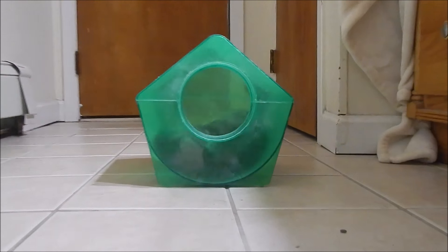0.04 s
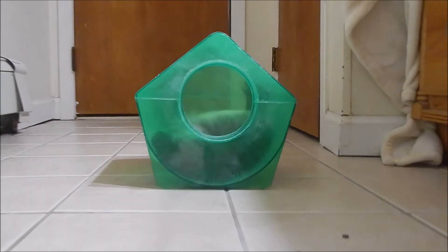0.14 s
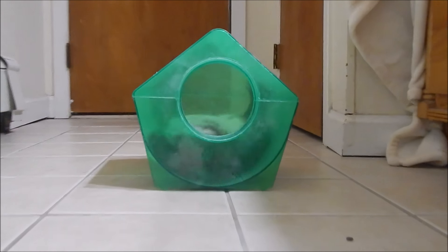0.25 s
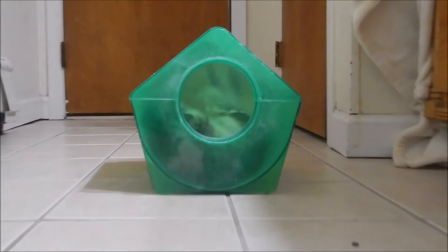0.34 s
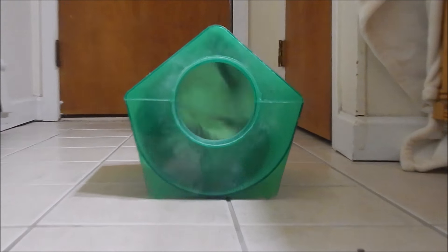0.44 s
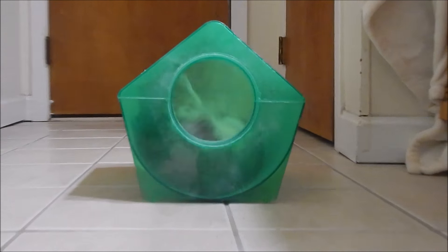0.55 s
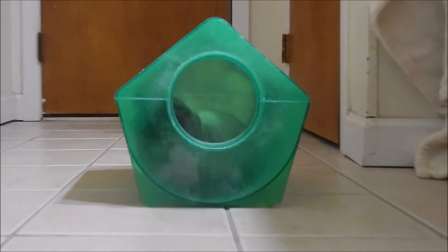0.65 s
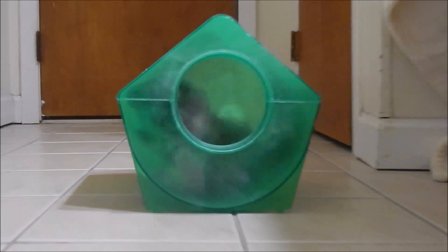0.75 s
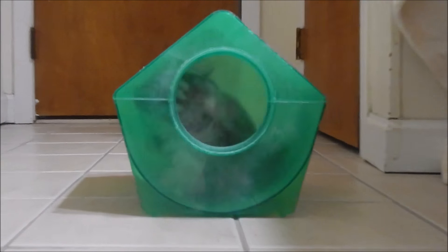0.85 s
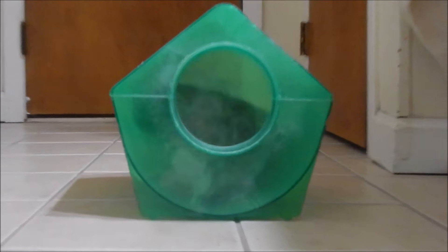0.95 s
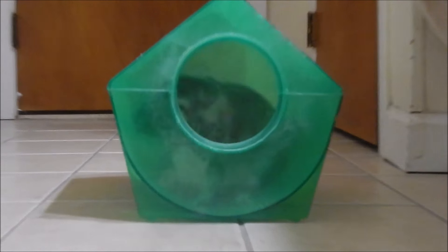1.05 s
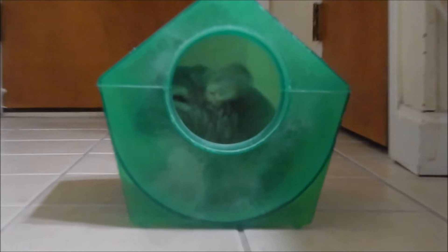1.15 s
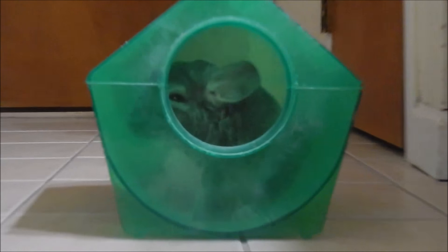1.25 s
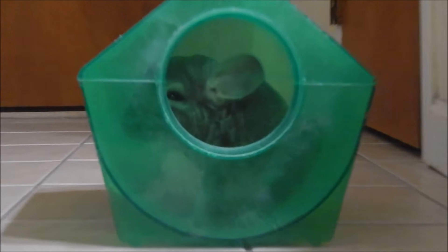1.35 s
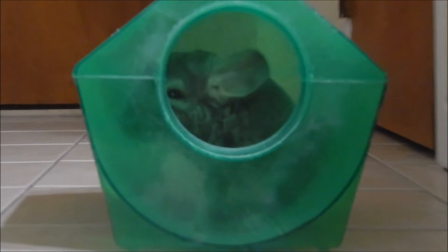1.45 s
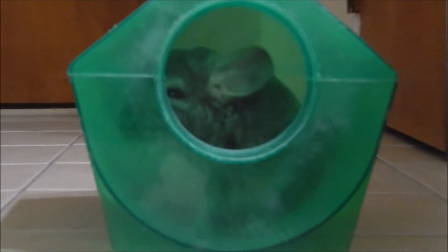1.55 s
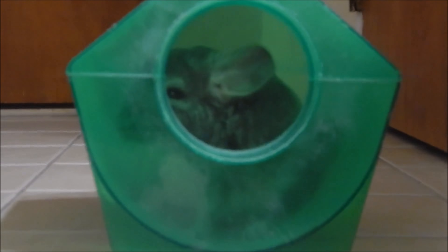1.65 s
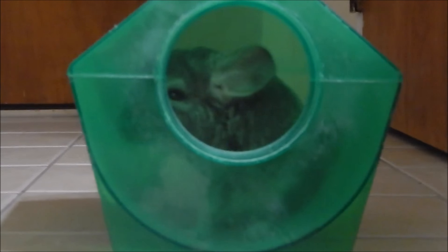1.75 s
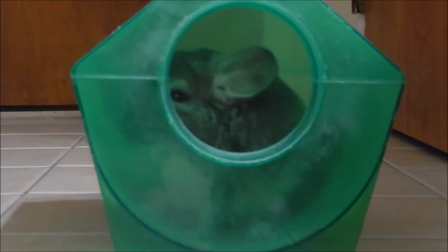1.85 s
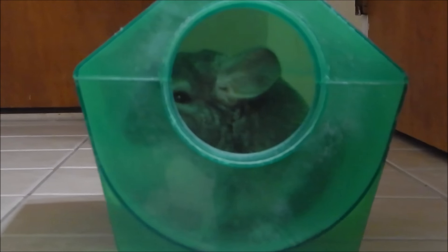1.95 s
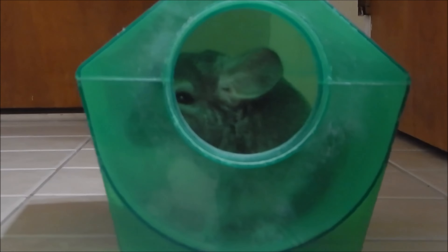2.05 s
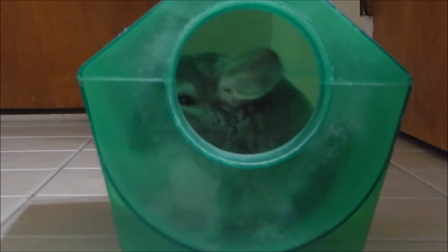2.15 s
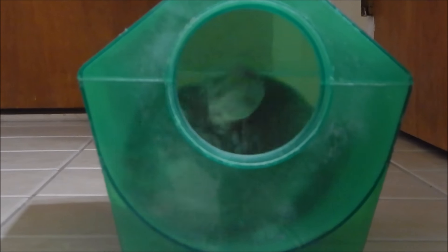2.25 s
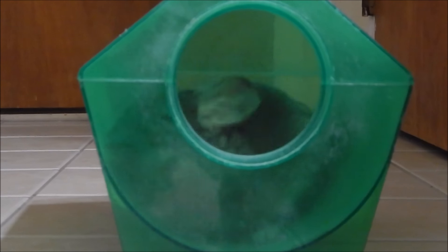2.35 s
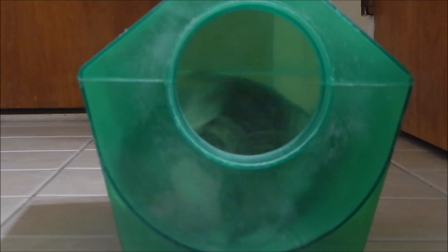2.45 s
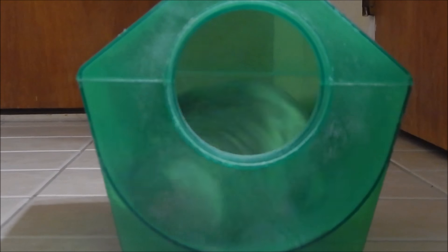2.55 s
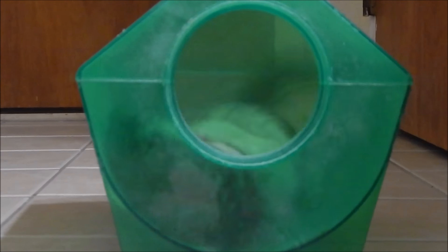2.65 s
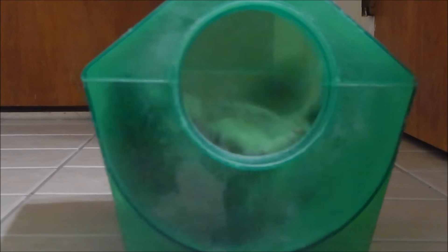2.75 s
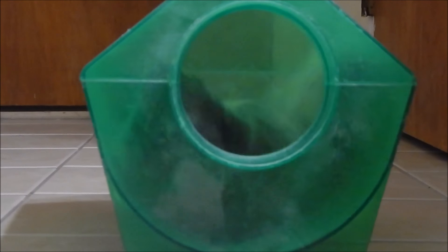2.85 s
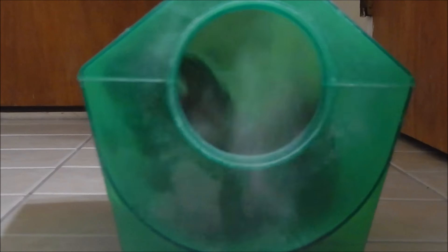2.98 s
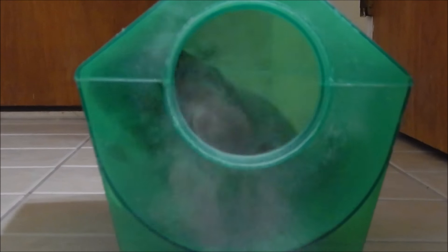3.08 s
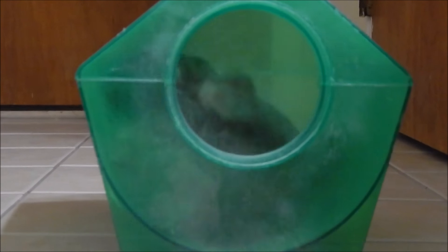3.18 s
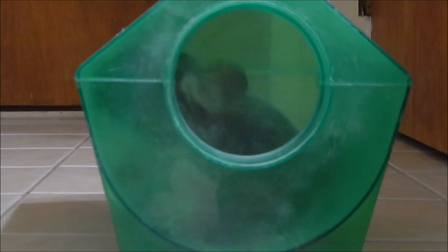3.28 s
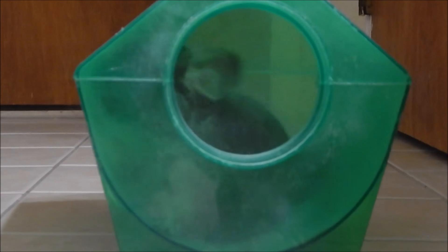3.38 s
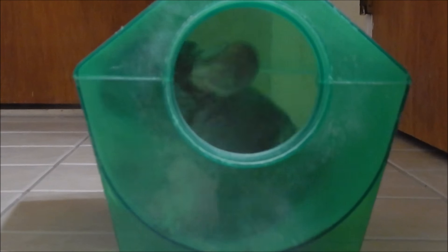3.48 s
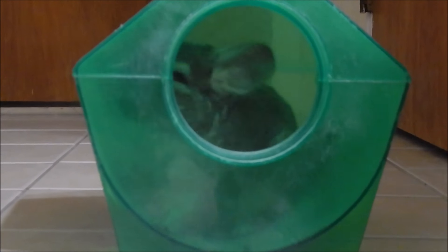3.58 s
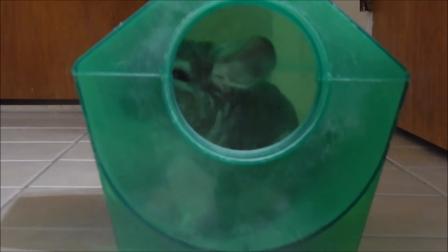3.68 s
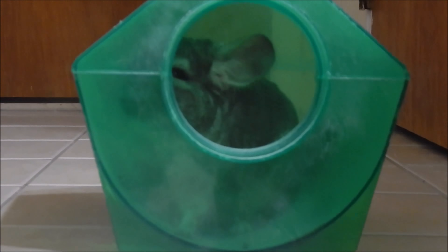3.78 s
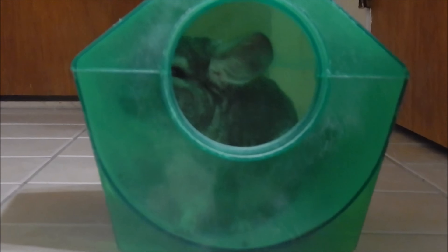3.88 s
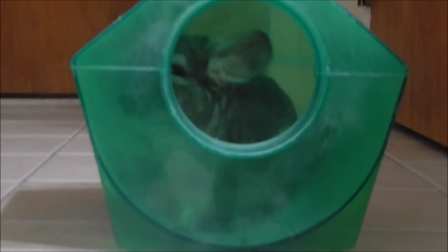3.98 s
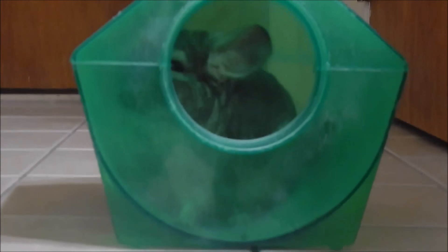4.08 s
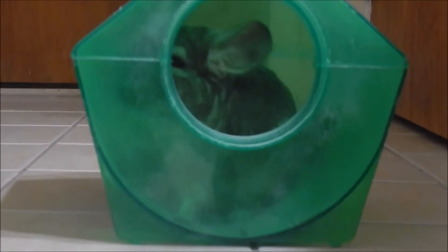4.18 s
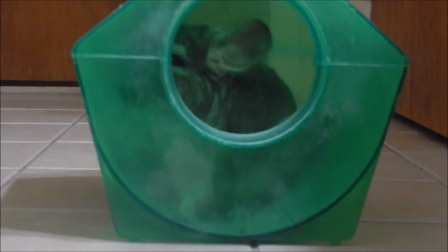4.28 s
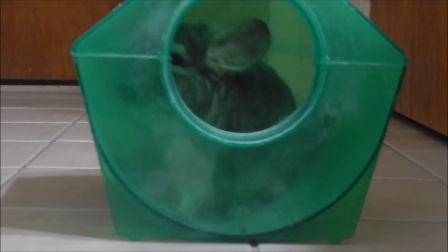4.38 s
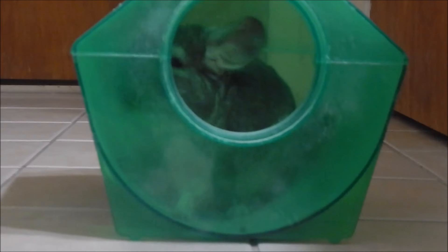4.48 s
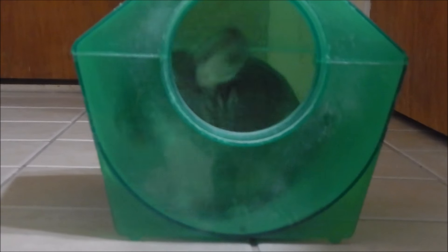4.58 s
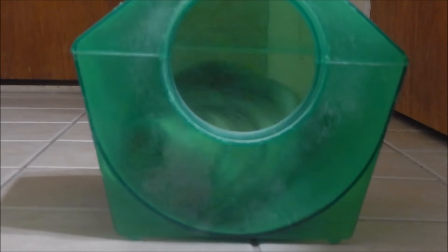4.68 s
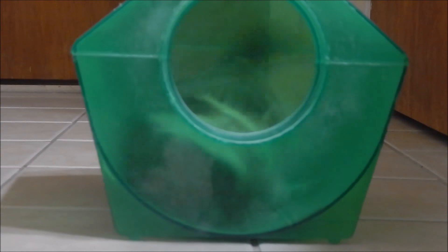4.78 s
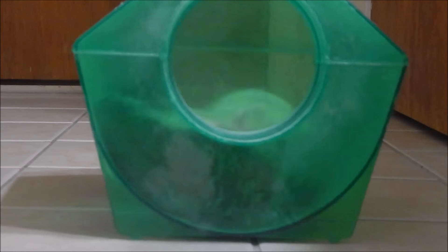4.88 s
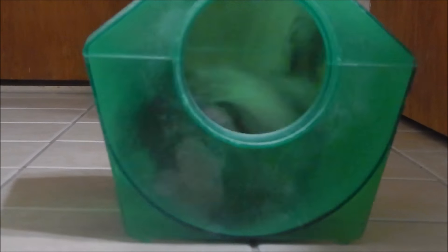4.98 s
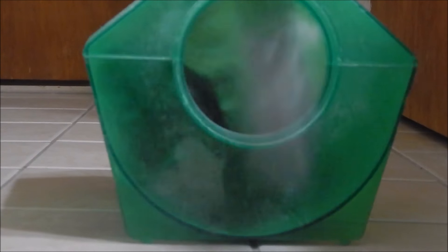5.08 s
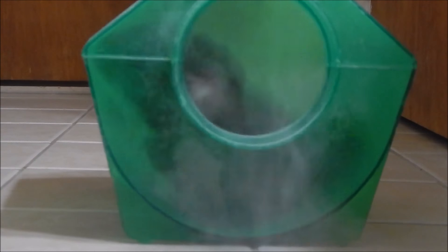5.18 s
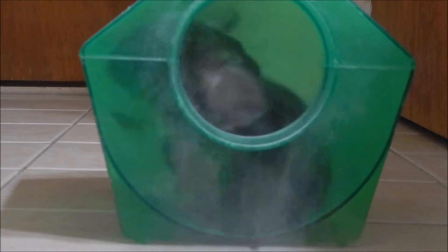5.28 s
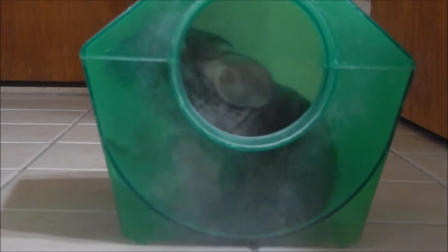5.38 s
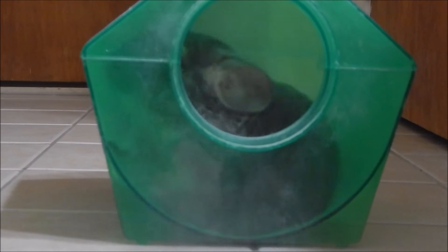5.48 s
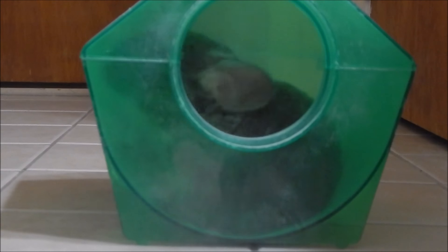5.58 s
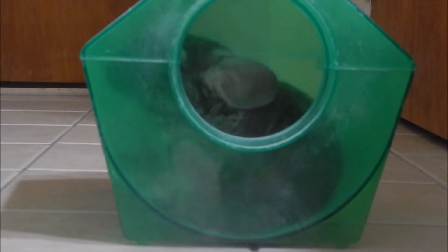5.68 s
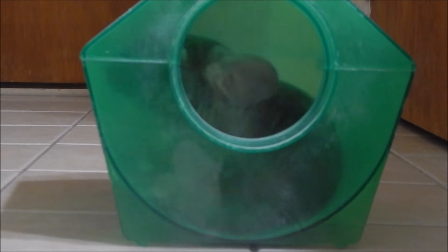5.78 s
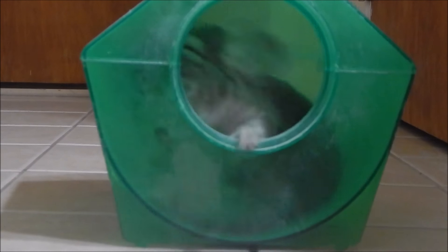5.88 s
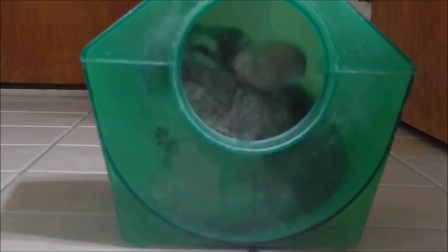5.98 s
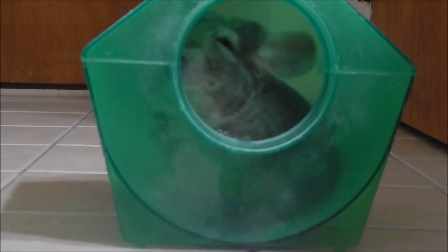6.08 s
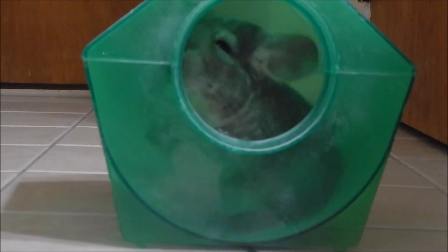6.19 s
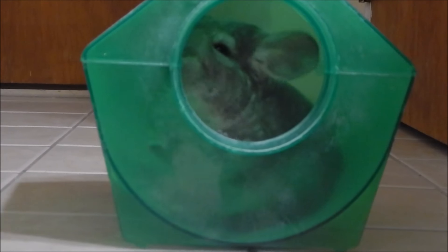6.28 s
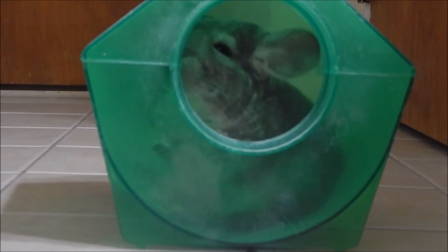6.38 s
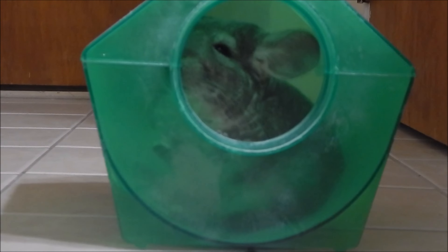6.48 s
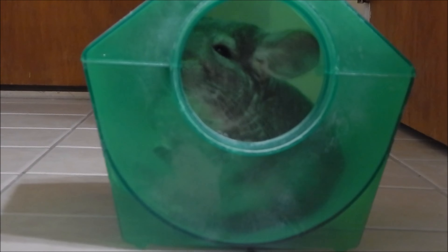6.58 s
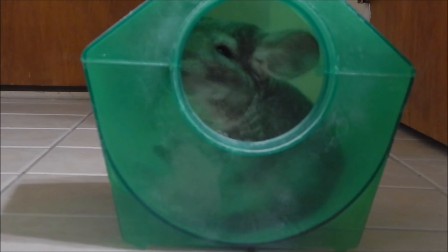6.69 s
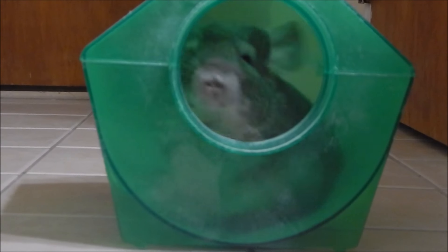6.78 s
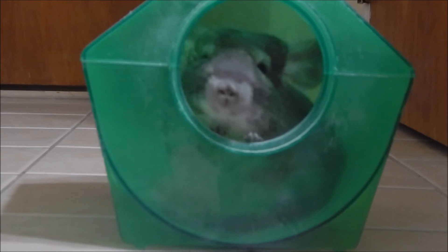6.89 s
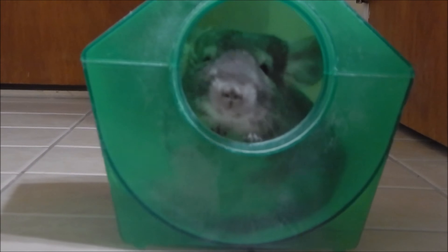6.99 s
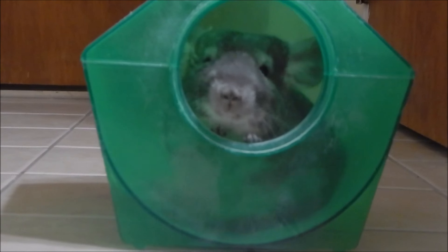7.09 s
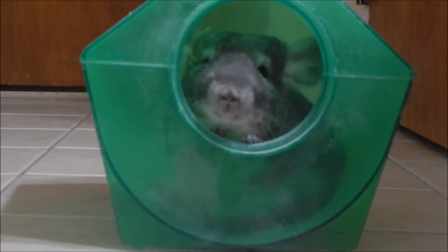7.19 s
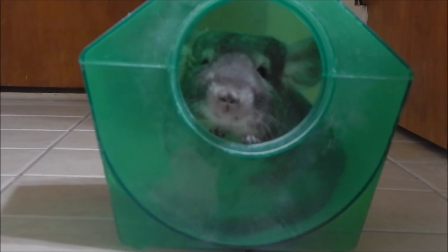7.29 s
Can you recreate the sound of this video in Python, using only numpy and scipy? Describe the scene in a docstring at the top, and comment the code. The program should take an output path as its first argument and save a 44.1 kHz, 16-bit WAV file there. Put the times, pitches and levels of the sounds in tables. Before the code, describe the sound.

A low steady hum and faint fan noise lie under bursts of hollow plastic drumming, as feet and body hit a thin shell. Soft dust hiss and short midrange scratches accompany each burst. A thin lens motor whine ends in a very loud dry snap, briefly dipping everything else. Two later bursts fade to small bumps. Close camera microphone indoors, short room echo, needle-like ticks.

```python
"""Dust bath in a plastic house

A small furry animal rolls in fine dust inside a hollow plastic house on a tiled floor, in bursts.
Blows and feet excite decaying modes of the shell; shaped noise makes dust hiss and claw strokes rasp.
An appliance adds hum tones, fan noise and rumble; random echoes make the room. A camera's lens motor
whines until the camera's lever snaps loudly, after one fainter snap; sharp ticks sound in the middle.
The gain control ducks when treble peaks are strong, then slowly recovers."""
import sys
import numpy as np
from scipy import signal
from scipy.io import wavfile
from scipy.ndimage import uniform_filter1d

SR = 44100
rng = np.random.default_rng(int(sys.argv[2]) if len(sys.argv) > 2 else 0)


def master(y):
    """Save y as 16-bit WAV."""
    cut = np.clip(np.atleast_2d(y).T, -1, 1)
    pcm = np.round(cut * 32767)  # scale
    wavfile.write(sys.argv[1], SR, pcm.astype(np.int16))


def gain_from_db(level_db):
    """Convert decibel levels to linear amplitude factors (20 dB per decade)."""
    decades = np.asarray(level_db, float) / 20
    return 10 ** decades


N = 323550


def evened(x):
    """Power normalisation: scales to rms 1."""
    return x / np.sqrt(np.mean(x ** 2) + 1e-20)


def read(points, hz):
    """Logarithmic frequency scale: interpolates a spectrum table along it."""
    f, value = np.transpose(points)
    return np.interp(np.log(hz + 1), np.log(f + 1), value)


def ring(hz, db, t60, rise):
    """Damped resonance: a sine mode that builds up over rise cycles and loses 60 dB in t60 seconds."""
    t = np.arange(SR // 3) / SR
    decay = gain_from_db(db - 60 * t / t60)
    buildup = 1 - np.exp(-t * hz / rise)
    return decay * buildup * np.sin(2 * np.pi * hz * t)


def noise(colour, same, patchy_db, size=1024):
    """Interchannel coherence: two partly alike channels of coloured noise with drifting patches."""
    frames, hz = 4 * N // size + 5, np.fft.rfftfreq(size, 1 / SR)
    a, b, c, d, patches = rng.standard_normal((frames, len(hz), 5)).T
    # smooth the patches along frequency, then time
    patches = uniform_filter1d(patches, 10, 0)
    patches = evened(uniform_filter1d(patches, 10, 1))
    same = np.clip(read(same, hz), -1, 1)[:, None]
    left, other = a + 1j * b, c + 1j * d
    right = same * left + np.sqrt(1 - same ** 2) * other
    spectra = np.array([left, right]) * gain_from_db(read(colour, hz)[:, None] + patchy_db * patches)
    sound = signal.istft(spectra, nperseg=size, noverlap=3 * size // 4)[1]
    return evened(sound[:, :N])


# how busy the animal is: start_s [s], scrabble_db [dB], dust_db (trickling) [dB]
ACTIVITY = [(0, -28.5, -56.5), (0.3, -31.5, -57.5), (0.68, -21, -54), (0.948, -40, -45.5), (1.1, -25, -58),
            (1.32, -34, -57.5), (1.551, -65, -58), (1.85, -60, -72), (2.25, -53.5, -65),
            (2.502, -28.5, -45.5), (3.099, -22.5, -56.5), (3.36, -49.5, -66), (3.7, -56, -64),
            (4.1, -52, -76), (4.55, -48.5, -63), (4.75, -32.5, -49.5), (4.95, -16, -60), (5.1, -27.5, -54),
            (5.3, -30, -48.5), (5.501, -44, -59), (5.799, -53, -61), (6.099, -36.5, -53.5),
            (6.5, -34, -67.5), (6.661, -57, -76), (6.9, -36, -56), (7.1, -49, -74), (7.33, -49, -79)]


def curve(column):
    """Amplitude envelope: one level column of the animal's activity at every sample, as gain."""
    rows = np.transpose(ACTIVITY)
    return gain_from_db(np.interp(np.arange(N) / SR, rows[0], rows[column]))


# the body sweeps dust along the wall: middle_s [s], length_s [s], dust_db [dB], claws_db [dB]
SWEEPS = [(0.207, .1, -56, -48), (0.411, 0.096, -48, -48.5), (0.532, 0.11, -47, -48.5),
          (0.681, 0.071, -45, -46.5), (0.804, 0.082, -50, -45.5), (0.895, .07, -54, -44),
          (1.035, .16, -47, -37), (2.312, 0.11, -57, -47), (2.45, 0.02, -42, -38.5),
          (2.516, 0.096, -43, -36.5), (2.791, 0.14, -41, -48), (2.988, 0.029, -48, -33),
          (3.107, 0.15, -47, -47), (3.46, 0.2, -54.5, -48.5), (3.585, 0.044, -46.5, -55),
          (3.67, 0.095, -53.5, -49.5), (4.655, 0.068, -55, -50), (4.776, 0.18, -43, -39),
          (4.928, 0.14, -43, -43), (5.029, 0.094, -41, -42.5), (5.15, 0.057, -49, -46.5),
          (5.297, 0.21, -53.5, -44), (5.588, 0.064, -56, -54), (5.667, 0.052, -51.5, -46),
          (5.944, .05, -51.5, -41), (6.022, 0.036, -51, -48), (6.114, 0.056, -45.5, -45),
          (6.175, 0.082, -46, -38), (6.257, 0.074, -51.5, -38.5), (6.856, 0.032, -49.5, -47),
          (6.911, 0.08, -51, -44)]


def swept(column, rest):
    """Power addition: sweeps, each a quick swell and slower fade, add to a resting gain."""
    t = np.arange(-SR // 2, SR // 2) / SR
    power = rest ** 2 * np.ones(N)
    for row in SWEEPS:
        # the swell takes 0.65 of the time of the fade; 6 dB is lost where away is 1
        away = 2 * abs(t) / row[1] / np.where(t < 0, 0.65, 1)
        at = np.arange(len(t)) + round(row[0] * SR) - SR // 2
        inside = (at >= 0) & (at < N)
        gain = gain_from_db(row[column] - 6 * away ** 1.78)
        power[at[inside]] += gain[inside] ** 2
    return np.sqrt(power)


# fan noise spectrum: frequency_hz [Hz], level_db (relative, per Hz) [dB]
AIR = [(88, -46), (150, -5), (217, -3.5), (244, -4), (275, -5.5), (383, -13.5), (414, -14), (649, -17.5),
       (702, -8.5), (759, -15.5), (888, -4.5), (1210, -18), (2310, -27), (2500, -29), (16000, -61.5)]
# left-right likeness of fan noise, rumble and claw strokes: frequency_hz [Hz], likeness [-1 to 1]
AIR_SAME = [(60, 0.95), (180, 0.92), (550, 0.95), (1650, 0.77), (4970, 0.092), (15000, 0.44)]
# rumble spectrum: frequency_hz [Hz], level_db (relative, per Hz) [dB]
RUMBLE = [(12, -24.5), (30, -13.5), (48, -4), (65, -1), (105, 3), (140, 8.5), (170, -49.5)]
# appliance tones: pitch_hz [Hz], level_db [dB]
HUM = [(120.4, -26), (60.4, -61), (26, -53)]


def hum():
    """Superposition: a mains tone and faint lower tones waver slightly over fan noise and rumble."""
    t = np.arange(N) / SR
    waver = uniform_filter1d(rng.standard_normal(N), 6000)
    waver = evened(uniform_filter1d(waver, 6000))
    tones = np.zeros(N)
    for hz, db in HUM:
        tones += np.sqrt(2) * gain_from_db(db + 0.3 * waver) * np.sin(2 * np.pi * hz * t)
    air = gain_from_db(-41) * noise(AIR, AIR_SAME, patchy_db=1.5)
    rumble = gain_from_db(-41) * noise(RUMBLE, AIR_SAME, patchy_db=-3.0, size=4096)
    return tones + air + rumble


# dust hiss spectrum: frequency_hz [Hz], level_db (relative, per Hz) [dB]
DUST = [(710, -33), (1200, -16), (1630, -6), (1810, -16), (2480, -10), (3870, -13), (5130, -15),
        (10600, -16.5), (14700, -25.5), (16000, -71)]
# left-right likeness of the hiss: frequency_hz [Hz], likeness [-1 to 1]
DUST_SAME = [(1000, 0.27), (3000, 0.07), (15000, 0.12)]
# claws on the wall: start_s [s], level_db [dB], centre_hz [Hz]
CLAWS = [(2.2974, -34, 1730), (3.4356, -33.5, 2000), (3.5713, -31.5, 1770), (5.9484, -41, 3500),
         (6.1774, -35, 1800), (6.2467, -31.5, 1670), (6.8468, -42, 2130)]


def dust():
    """Granular noise: fine grains sweep the walls with slight flutter, and a few claws scratch."""
    flutter = evened(uniform_filter1d(rng.standard_normal(N), 500))
    hiss = noise(DUST, DUST_SAME, patchy_db=1.5, size=256)
    out = swept(column=2, rest=curve(column=2)) * gain_from_db(1.6 * flutter) * hiss
    t = np.arange(3000) / SR
    for s, db, hz in CLAWS:
        grit = rng.standard_normal((2, len(t)))
        grit = grit[0] + 0.32 * grit  # mostly shared by both sides
        band = signal.butter(1, [0.6 * hz, min(1.8 * hz, SR / 2.2)], "band", fs=SR)
        at = round(s * SR)
        out[:, at:at + len(t)] += gain_from_db(db - 60 * t / 0.026) * signal.lfilter(*band, grit)
    return out


# spectrum of claw strokes and faint fan noise: frequency_hz [Hz], level_db (relative, per Hz) [dB]
SCRATCH = [(900, 4), (1500, -3), (2100, -1.5), (2700, -16), (3500, -19), (5000, -34), (9000, -52.5)]


def scratch():
    """Amplitude modulation: claw strokes rasp in the midrange over a faint, steady, grainy fan noise."""
    grain_db = 3.5 * evened(uniform_filter1d(rng.standard_normal(N), 200))
    grainy = gain_from_db(grain_db) * noise(SCRATCH, AIR_SAME, patchy_db=-0.5, size=256)
    return swept(column=3, rest=gain_from_db(-59.5)) * grainy  # rest: the fan noise


# modes of the shell, grouped as floor drum, walls, thin panels: pitch_hz [Hz], level_db [dB], t60_s [s]
SHELL = [
    [(59.5, -8, 0.26), (80.6, -1.5, 0.26), (134.76, 2, 0.46), (148.44, 5, 0.6)],
    [(231.3, 5.5, 0.5), (266.3, 2, 0.34), (297.6, 2.5, 0.47), (336.8, -12, 0.25), (393.3, 2, 0.13)],
    [(525, 4, 0.27), (705, -14, 0.3), (744, 1.5, 0.16), (820, 6, 0.14), (1034, 7.5, 0.033),
     (1252, -6.5, 0.16), (1800, -14.5, 0.098), (1540, -2.5, 0.035), (2200, -25, .03)],
]
# scrabbling gain of the three groups: drum_db, walls_db, panels_db [dB]
SCRABBLE_MIX = [14, 13.85, -3.3]


def scrabble():
    """Impulse response: small random kicks of the feet set off every shell mode between the blows."""
    out, busy = np.zeros(N), curve(column=1)
    for group, mix_db in zip(SHELL, SCRABBLE_MIX):
        for hz, db, t60 in group:
            kicks = rng.random(N) < 75 / SR  # 75 per second on average
            feet = rng.standard_normal(N) * kicks * busy * gain_from_db(mix_db)
            mode = ring(hz, 0, t60, rise=0.39)
            mode *= gain_from_db(db) / np.linalg.norm(mode)
            out += signal.oaconvolve(feet, mode)[:N]
    return out


# lens motor while the lever is held: centre_hz [Hz], width_hz [Hz], level_db [dB]
WHINE = [(7250, 350, -68.5)]


def lens_motor():
    """Narrow-band noise: the lens motor whines until the lever is let go at the last snap."""
    out = np.zeros((2, N))
    held = np.arange(N) < SNAPS[-1][0] * SR
    for hz, width, db in WHINE:
        band = signal.butter(2, [hz - width / 2, hz + width / 2], "band", fs=SR, output="sos")
        whine = evened(signal.sosfilt(band, rng.standard_normal((2, N))))
        out += gain_from_db(db) * whine * held
    return out


# the body's load on drum, walls, panels: detuning [share], swell [cycles],
# ringing_on [share], damping_s [s]
LOADING = [(0.022, 1.8, 0.34, 0.055), (0.021, 1.1, 0.13, 0.018), (0.026, 0.45, .35, 0.0091)]


def blow(levels_db, spots_hz):
    """Modal excitation: modes near the struck spot ring loudest, detuned and damped by the body."""
    t, out = np.arange(SR // 3) / SR, 0
    # fur and feet land raggedly, not in one instant
    contact = rng.standard_normal(900) * gain_from_db(-60 * t[:900] / 0.027)
    knock = signal.lfilter(*signal.butter(3, [500, 1250], "band", fs=SR), contact)
    contact[0] = 9 * np.sign(contact[0])  # the first touch is the hardest
    for group, level_db, spot_hz, load in zip(SHELL, levels_db, spots_hz, LOADING):
        spread, rise, on, damp = load
        part = 0
        for hz, db, t60 in group:
            uneven, detune = rng.standard_normal(2)
            octaves = abs(np.log2(hz / spot_hz))
            near_db = -30 * min(octaves, 0.5)
            mode_db = db + near_db + 1.5 * uneven
            part = part + ring(hz * (1 + spread * detune), mode_db, t60, rise)
        damping = on + (1 - on) * np.exp(-(t / damp) ** 2)
        part = signal.oaconvolve(part * damping, contact)
        out = out + gain_from_db(level_db) * part / abs(part).max()
    out[:900] += gain_from_db(levels_db[-1] - 3.5) * knock / abs(knock).max()
    return out


# body and feet against the shell: start_s [s], drum_db [dB], walls_db [dB], panels_db [dB],
# panel_spot_hz [Hz]
BLOWS = [(0.036, -15.5, -14.5, -27.5, 503), (0.131, -22.5, -17.5, -27.5, 850), (0.215, -8, -10.5, -18, 525),
         (0.29, -24, -19, -45, 873), (0.396, -9.5, -14.5, -18.5, 822), (0.45, -17, -16.5, -30, 817),
         (0.496, -11, -15.5, -34, 482), (0.561, -16, -14, -22.5, 820), (0.601, -14, -20, -39, 557),
         (0.663, -11.5, -12, -19, 850), (0.72, -10.5, -12, -17, 770), (0.874, -15.5, -30, -36.5, 528),
         (0.921, -29, -48, -52, 870), (1.016, -20, -14, -35, 924), (1.057, -15, -13, -31, 500),
         (1.093, -9.5, -16, -24, 506), (1.233, -15.5, -23, -34, 500), (1.279, -19, -19.5, -35, 505),
         (2.456, -15.5, -9, -25, 500), (2.497, -32, -14.5, -28, 654), (2.545, -13.5, -23, -33.5, 509),
         (2.603, -10.5, -15, -29.5, 525), (2.637, -19.5, -35, -28.5, 487), (2.735, -12.5, -8.5, -20.5, 696),
         (2.765, -11.5, -18.5, -21, 728), (2.799, -9, -13, -30, 482), (2.85, -11, -10.5, -19.5, 617),
         (2.966, -28, -3.5, -25, 577), (2.993, -13, -9.5, -25, 930), (3.093, -24, -14, -20.5, 930),
         (3.078, -13.5, -9, -20.5, 525), (3.113, -39, -11, -41, 510), (3.574, -50, -28.5, -54, 680),
         (3.749, -34, -33, -31, 876), (4.673, -21, -30.5, -37, 934), (4.737, -11, -17, -29.5, 540),
         (4.806, -32, -14.5, -35, 592), (4.91, -23, -34, -23.5, 810), (4.846, -24, -20, -50, 800),
         (4.895, -22, -9.5, -21, 524), (4.947, -14, -7, -17.5, 544), (4.989, -8.5, -10, -33, 477),
         (5.021, -10.5, -36, -34, 541), (5.055, -15.5, -13.5, -29.5, 525), (5.188, -41, -14.5, -44, 514),
         (5.218, -17.5, -17, -27.5, 810), (5.26, -10.5, -14.5, -29, 525), (5.32, -23, -18, -27, 525),
         (5.951, -28.5, -25, -29.5, 696), (6.09, -27, -34, -40, 900), (6.244, -40, -26, -41, 516),
         (6.277, -17.5, -23.5, -43, 506), (6.371, -20, -23, -41, 931), (6.483, -20.5, -30, -49, 958),
         (6.785, -24, -47, -56, 960), (6.89, -26, -36, -36.5, 520)]


def blows():
    """Linear superposition: the main blows on the shell ring on over one another."""
    out = np.zeros(N + SR)
    for s, *levels_db, panel_hz in BLOWS:
        # every blow meets the drum at 141.3 Hz and the walls at 244 Hz
        sound, at = blow(levels_db, [141.3, 244, panel_hz]), round(s * SR)
        out[at:at + len(sound)] += sound
    return out[:N]


def room(x):
    """Diffuse reverberation: dense random echoes, other ones for each side, with thin bass and top."""
    t = np.arange(SR // 3) / SR
    echoes = rng.random((2, len(t))) < 8000 / SR
    taps = rng.standard_normal((2, len(t))) * echoes * (t > 0.003)
    taps *= gain_from_db(-60 * t / 0.25)
    band = signal.butter(2, [650, 6000], "band", fs=SR)
    taps = signal.lfilter(*band, taps / np.linalg.norm(taps[0]))
    return signal.fftconvolve(x[None], taps, axes=1)[:, :N]


# needle-sharp ticks in the middle: start_s [s], level_db [dB]
TICKS = [(0.192, -28), (0.2583, -17), (0.691, -32.5), (0.7608, -19), (1.326, -22), (1.3932, -23),
         (1.8267, -32.5), (1.8932, -37), (1.9617, -27), (2.396, -22), (2.4618, -11.5), (2.963, -17.5),
         (3.028, -23.5), (4.163, -34), (4.597, -53), (5.165, -23), (5.2308, -22.5), (5.297, -21),
         (5.7313, -25), (5.7998, -22), (5.8646, -23.5), (6.2983, -28), (6.366, -20.5)]


def sharp_ticks():
    """Unit impulse: each tick is a single sample of random sign, equal on both sides."""
    s, db = np.transpose(TICKS)
    out = np.zeros(N)
    at = np.round(s * SR).astype(int)
    np.add.at(out, at, gain_from_db(db) * np.sign(rng.standard_normal(len(s))))
    return out


# the camera's lever: start_s [s], left_db [dB], right_db [dB], lowest_hz (that it stirs) [Hz]
SNAPS = [(0.872, -4.5, -25, 2960), (1.5285, 15, 19, 810)]
# modes of the camera casing: pitch_hz [Hz], level_db [dB], t60_s [s]
CASING = [(1140, -6, 0.0051), (1910, -14, 0.0051), (2370, -8, 0.0038), (3550, -4, 0.0074),
          (4160, 2, 0.0028), (5010, -2.5, 0.0037), (6150, -6.5, 0.0021), (7120, -8, 0.002),
          (10020, -6.5, 0.0026)]


def lever():
    """Source-filter principle: the lever rattles for a few ms and the casing's modes colour it."""
    t, out = np.arange(600) / SR, np.zeros((2, N))
    casing = sum(ring(hz, db, t60, rise=0.34) for hz, db, t60 in CASING)
    casing[:2] = 2.7  # the bare crack
    for s, *sides_db, low_hz in SNAPS:
        rattle = rng.standard_normal((2, len(t))) * t ** 2 * np.exp(-t / 0.0011)
        snap = signal.fftconvolve(rattle, casing[None], axes=1)
        snap = signal.lfilter(*signal.butter(2, low_hz, "high", fs=SR), snap)
        side_gain = gain_from_db(sides_db) / np.linalg.norm(snap, axis=1)
        at = round(s * SR)
        out[:, at:at + snap.shape[1]] += snap * side_gain[:, None]
    return out


def scene():
    """Superposition: house, room and appliance sit slightly left; the camera's own sounds on top."""
    house = scrabble() + blows()
    camera = lens_motor() + lever()
    slightly_left = gain_from_db([[0.35], [-0.35]])
    echoes = gain_from_db(-2.0) * room(house + gain_from_db(-13) * camera.mean(0))
    return (house + echoes + dust() + scratch() + hum()) * slightly_left + camera


def gain_control(x):
    """Dynamic range compression: treble peaks pull the gain down at once; it climbs back slowly."""
    heard = abs(signal.lfilter(*signal.butter(2, 1500, "high", fs=SR), x)).max(0)
    peak_db = 20 * np.log10(heard + 1e-9)
    climb_db = np.arange(N) * 15.5 / SR  # regains 15.5 dB per second
    held_db = np.maximum.accumulate(peak_db + climb_db) - climb_db
    over_db = np.maximum(held_db + 8.5, 0)  # acts above -8.5 dB
    return x / gain_from_db(uniform_filter1d(over_db, 60))


def band_limit(x):
    """A steep low-pass at the top of the band."""
    return signal.sosfilt(signal.butter(12, 16820, fs=SR, output="sos"), x)


def record(dry):
    """Low-pass response: the microphones lose the top; gain control follows, then ticks join."""
    dulled = signal.lfilter(*signal.butter(3, 13500, fs=SR), dry)
    mix = gain_control(dulled) + sharp_ticks()
    return band_limit(mix)


dry = scene()
out = record(dry)
master(out)
```